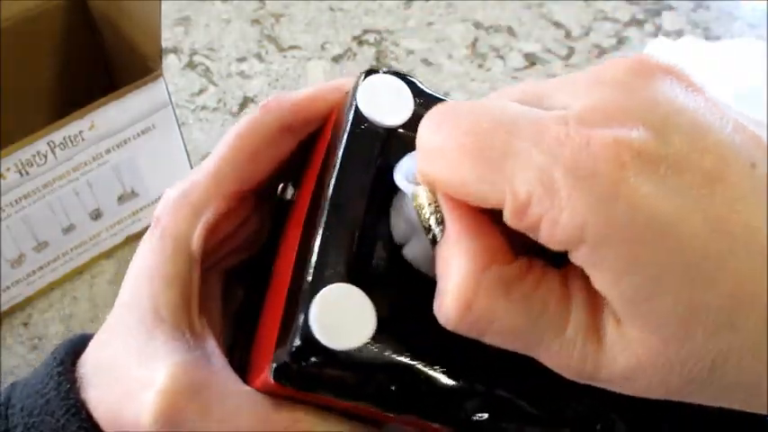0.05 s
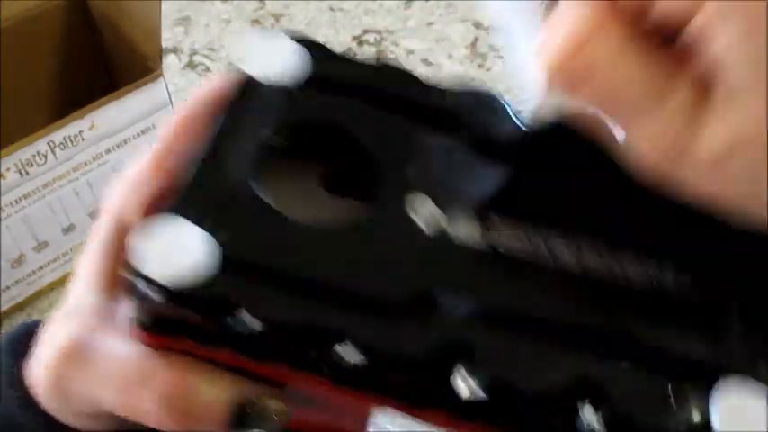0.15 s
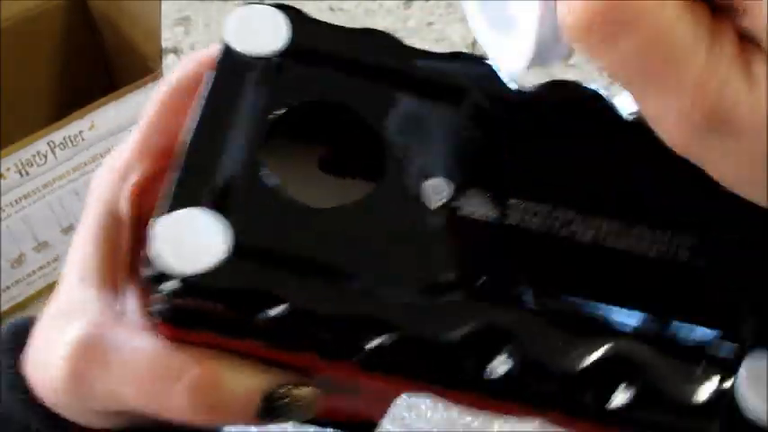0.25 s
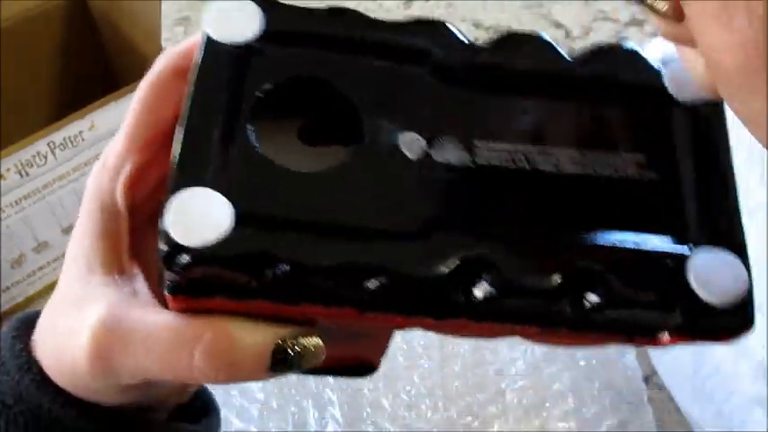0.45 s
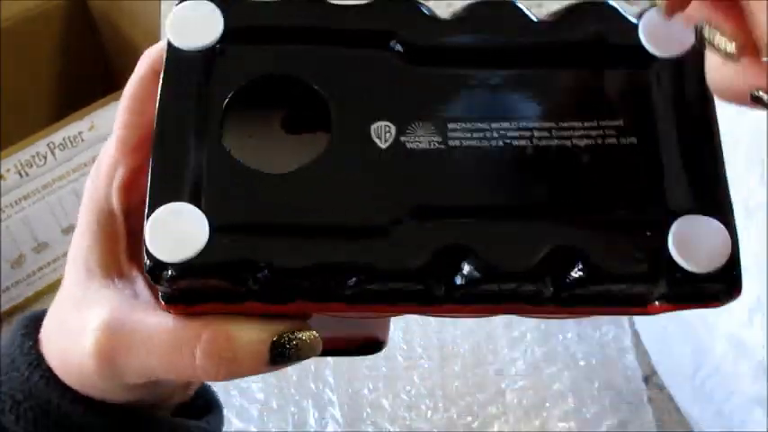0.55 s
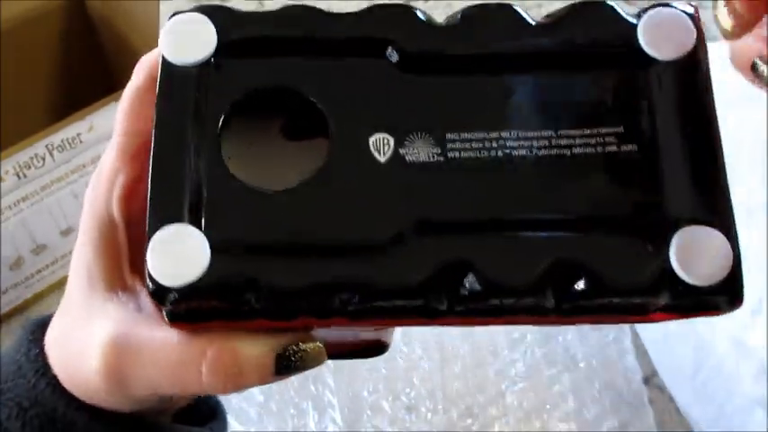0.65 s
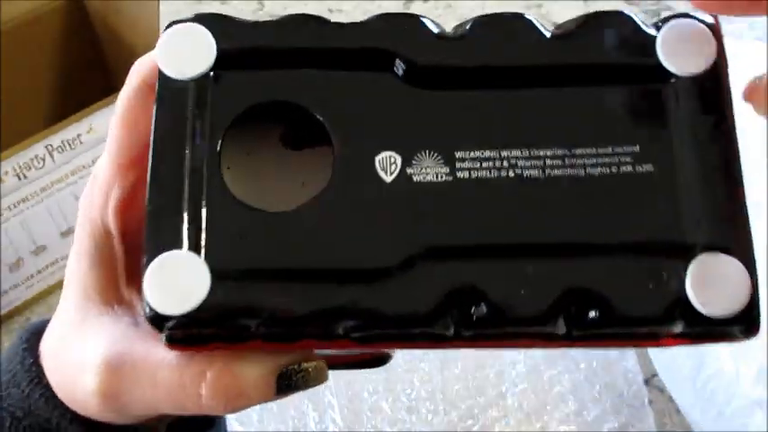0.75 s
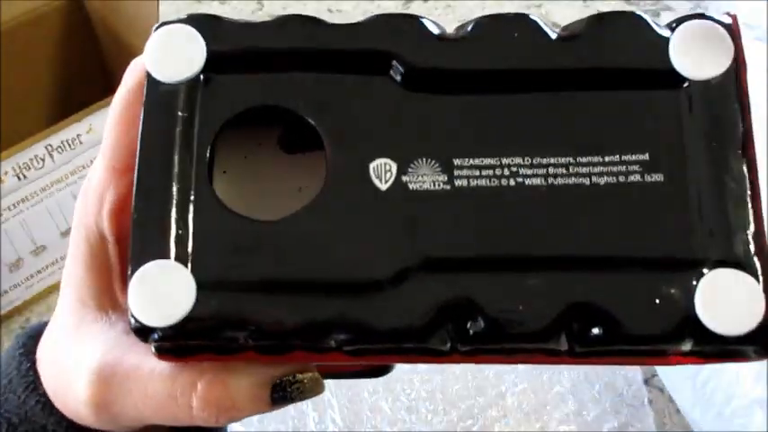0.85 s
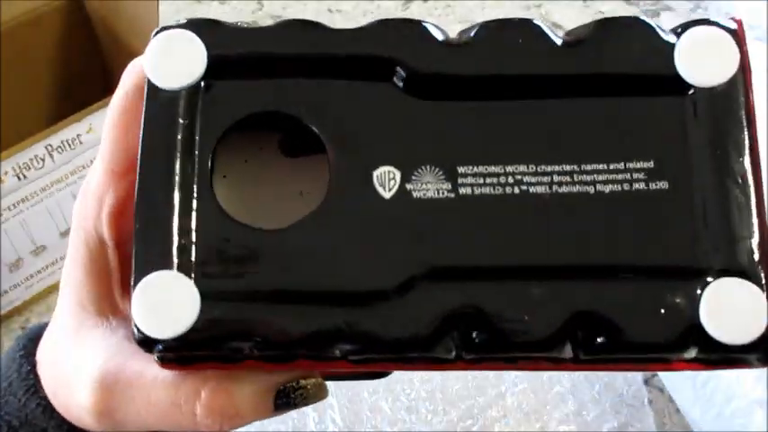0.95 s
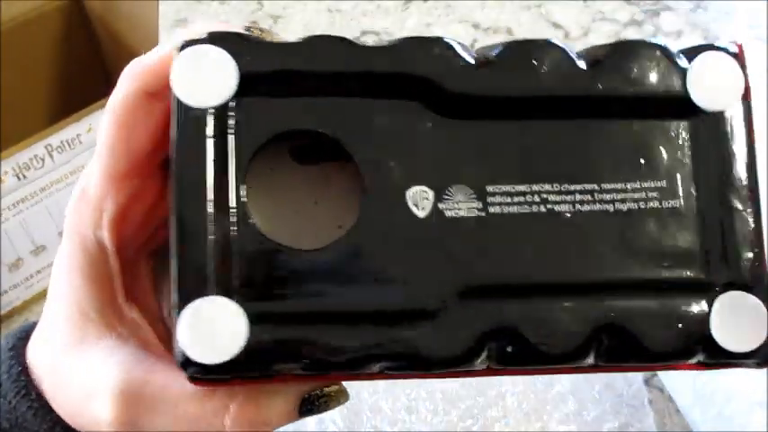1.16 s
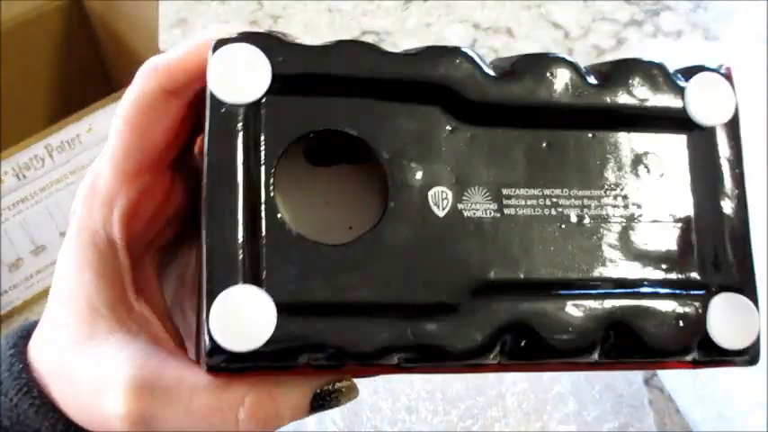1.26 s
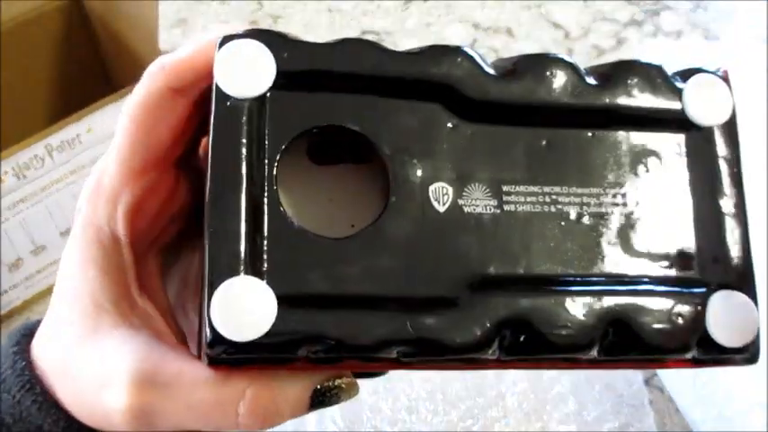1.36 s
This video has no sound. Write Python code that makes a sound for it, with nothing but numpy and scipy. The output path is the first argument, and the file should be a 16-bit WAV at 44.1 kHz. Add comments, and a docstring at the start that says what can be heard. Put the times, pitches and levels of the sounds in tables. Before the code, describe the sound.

A soft plastic stopper pops out of a hollow ceramic box after a few faint creaks and a brief squeak. Fingers tick on the glaze, then one sharp click and a soft bump follow, close by in a quiet room.

```python
"""A stopper popping out of a ceramic box

A soft plastic stopper creaks in the base of a hollow ceramic box, slides, and pops out. The air inside
resonates, rising in pitch as the hole opens, and the stopper's lip flicks over the rim. Fingers brush and
tick on the glaze; one sharp click and a soft bump on the counter follow, close by in a quiet room."""
import sys
import numpy as np
from scipy import signal
from scipy.fft import rfft, irfft
from scipy.io import wavfile

SR = 44100
rng = np.random.default_rng(int(sys.argv[2]) if len(sys.argv) > 2 else 0)


def log_audio(samples):
    """Write samples as a 16-bit WAV file to the path given in sys.argv[1]."""
    # one column per channel
    frames = np.atleast_2d(samples).T
    # limit to full scale, then quantise
    limited = np.clip(frames, -1, 1)
    pcm = np.round(limited * 32767).astype(np.int16)
    wavfile.write(sys.argv[1], SR, pcm)


N = 61739
T = np.arange(N) / SR


def undb(db):
    """Amplitude ratio of a level in decibels."""
    return 10 ** (np.asarray(db) / 20)


def unit(x):
    """Normalisation to rms 1."""
    return x / np.std(x)


def fade(t60, start=0):
    """Exponential decay from a start time, falling 60 dB in t60 seconds."""
    return (T >= start) * np.exp(-np.log(1000) * np.maximum(T - start, 0) / t60)


def later(x, s):
    """Pure delay of s seconds."""
    return np.concatenate([np.zeros(max(int(s * SR), 0)), x])[:N]


def through(x, response):
    """Convolution with an impulse response."""
    return signal.fftconvolve(x, response)[:N]


def colour(points, tilt_db=0):
    """Minimum-phase response of unit energy from a spectrum, tilted by tilt_db an octave above 1024 Hz."""
    hz, db = np.array(points, float).T
    octave = np.log2(np.maximum(np.fft.rfftfreq(8192, 1 / SR), 1))
    gain = undb(np.interp(octave, np.log2(hz), db) + tilt_db * np.maximum(octave, 10))
    cepstrum = irfft(np.log(gain))
    half = len(cepstrum) // 2
    cepstrum[1:half] *= 2
    cepstrum[half + 1:] = 0
    response = irfft(np.exp(rfft(cepstrum)))[:half]
    return response / np.linalg.norm(response)


def noise(points):
    """Spectrally shaped Gaussian noise of rms 1."""
    return unit(through(rng.standard_normal(N), colour(points)))


def ring(modes):
    """Free vibration: one damped sinusoid for each mode."""
    return sum(undb(db) * np.sin(2 * np.pi * hz * T) * fade(t60) for hz, db, t60 in modes)


def contact(t60, rough):
    """Contact force: an impulse followed by a short crunch of noise."""
    crunch = rng.standard_normal(N) * fade(t60) * (T > 0)
    return (T == 0) + rough * crunch / np.linalg.norm(crunch)


def slips(scatter_db):
    """Friction noise: dense tiny slips whose size changes every 20 samples."""
    grains = rng.standard_normal(N)
    size_db = scatter_db * np.repeat(rng.standard_normal(N // 20 + 1), 20)[:N]
    return unit(grains * undb(size_db))


def creaks():
    """Stick-slip friction: the stopper grips and lets go as it is worked loose."""
    # slips of the stopper: start_s, relative_level_db
    releases = [(0.0006, -21), (0.0097, -30.5), (0.0268, -28.5), (0.1373, -26.5), (0.1485, -30),
                (0.1635, -33), (0.178, -31.5), (0.179, -30.5), (0.1986, -38)]
    # spectrum of a creak: frequency_hz, level_db
    spectrum = [(200, -26), (1300, -8.5), (2000, -4), (2800, -4.5), (4200, -2), (5500, -17), (8000, -18.5),
                (15000, -40)]
    force = sum(undb(db) * later(contact(t60=0.0071, rough=1.15), s) for s, db in releases)
    return 2 * through(force, colour(spectrum))


def wall_ring(blows):
    """Modal resonance: blows on the rim set the ceramic wall ringing."""
    # modes of the wall: pitch_hz, relative_level_db, t60_s
    modes = [(838, -3, .12), (1910, -3, .04), (2104, -6, .1), (2235, 2.5, 0.1), (3220, 1, 0.028),
             (3765, 1, 0.068), (4450, -2, 0.037), (5230, 5, 0.016), (6960, -5, 0.023)]
    return undb(-44) * through(blows, ring(modes))


def scuffs():
    """Sliding friction: stopper and fingers brush the glaze in strokes that rise fast and decay."""
    # strokes on the glaze: start_s, level_db, attack_s, t60_s
    strokes = [(0.001, -49, 0.0017, 0.11), (0.245, -26.5, 0.0071, 0.094), (0.269, -25.5, 0.0075, 0.031),
               (0.321, -41, .002, 0.14), (0.367, -42.5, 0.003, 0.11)]
    # spectrum of a scuff: frequency_hz, level_db
    spectrum = [(100, -15), (700, -19.5), (1400, -6), (2100, 4), (3000, -1), (4400, -0.5), (6000, -2),
                (8500, -9), (11000, -16.5), (15000, -35)]
    pressure = np.zeros(N)
    for s, db, attack, t60 in strokes:
        rise = np.maximum(T - s, 0) / attack
        pressure += undb(db) * np.where(T < s + attack, rise, fade(t60, s + attack))
    return pressure * through(slips(scatter_db=4.5), colour(spectrum))


def lip_squeak():
    """Forced vibration: friction drives the resonances of the lip as it slides through the hole."""
    # resonances of the lip: pitch_hz, bandwidth_hz, gain_db
    resonances = [(2290, 780, 1.5), (3100, 150, -12), (4330, 150, 0.5), (4890, 300, 7), (7070, 300, -15),
                  (8190, 320, -11), (8500, 220, -18), (10400, 610, -37), (13100, 670, -13)]
    # envelope of the slide: time_s, level_db
    slide = [(0.208, -56), (0.222, -35.5), (0.226, -30), (0.229, -22), (0.236, -19.5), (0.239, -36),
             (0.248, -30), (0.26, -60)]
    grit = slips(scatter_db=4)
    lip = undb(-19) * grit  # broadband part
    for hz, width, db in resonances:
        lip += undb(db) * signal.lfilter(*signal.iirpeak(hz, hz / width, SR), grit)
    time_s, level_db = np.array(slide).T
    sliding = (T > time_s[0]) & (T < time_s[-1])
    return unit(lip) * undb(np.interp(T, time_s, level_db)) * sliding


def air_mode(hz, pulses, attack_s=0.001):
    """Damped oscillation of enclosed air at a gliding pitch; each pulse takes over from the last."""
    amplitude = 0
    for s, db, t60 in pulses:
        held = np.exp(-np.maximum(T - s, 0) / attack_s)
        amplitude = held * amplitude + (1 - held) * undb(db) * fade(t60, s)
    started = T > pulses[0][0]
    return -amplitude * np.sin(2 * np.pi * np.cumsum(hz * started) / SR)


def pop():
    """Cavity resonance: the seal snaps and two air modes ring, rising as the hole is uncovered."""
    # air pulses: start_s, hollow_db (before the surge), hollow_t60_s, upper_db, upper_t60_s
    pulses = [(0.2294, -15.5, 0.17, -17, 0.16), (0.271, -17, 0.056, -20.5, 0.095)]
    # spectrum of the seal letting go: frequency_hz, level_db
    snap_spectrum = [(100, -52), (300, -1.5), (550, -3.5), (850, 4.5), (1400, -2), (3000, -28.5),
                     (15000, -50)]
    start_s = pulses[0][0]
    since = np.maximum(T - start_s, 0)

    def glide(shut_hz, open_hz, opening_s):
        return open_hz + (shut_hz - open_hz) * np.exp(-since / opening_s)

    hollow_hz = glide(shut_hz=204.3, open_hz=362.8, opening_s=0.0127)
    scoop_hz = 650 * np.exp(-since / 0.0017)  # the upper mode swoops in from below
    upper_hz = glide(shut_hz=1238, open_hz=1335, opening_s=0.085) - scoop_hz
    surge_db = 9.5 * np.exp(-since / 0.0087)  # the first rush of air swells the hollow note
    hollow = air_mode(hollow_hz, [(s, db, t60) for s, db, t60, _, _ in pulses]) * undb(surge_db)
    upper = air_mode(upper_hz, [(s, db, t60) for s, _, _, db, t60 in pulses])
    snap = -undb(1) * through(contact(t60=0.0027, rough=0.65), colour(snap_spectrum))
    low_cut = signal.butter(3, 130, "high", fs=SR, output="sos")
    return signal.sosfilt(low_cut, hollow + upper + later(snap, start_s))


def flicks():
    """Impulsive excitation: the stopper's lip flicks over the rim."""
    # blows of the lip: start_s, relative_level_db, tilt_db_per_octave
    blows = [(0.2357, -5, 5), (0.2761, -6.5, -2.5), (0.2802, -16, 0)]
    # spectrum of a flick: frequency_hz, level_db
    spectrum = [(100, -16), (600, -24.5), (1300, -3), (1900, 1), (2500, -5.5), (4100, 6.5), (5600, -5),
                (7500, -1.5), (10000, -8.5), (15000, -22.5)]
    sound = np.zeros(N)
    for s, db, tilt in blows:
        flick = through(contact(t60=0.0048, rough=1.0), colour(spectrum, tilt))
        sound += undb(db) * later(flick, s)
    return 2 * sound


def jolts():
    """Heavily damped vibration: each jolt of the box in the hand is one dull, low mode."""
    # jolts of the box: start_s, level_db, pitch_hz, t60_s
    shakes = [(0.275, -28.5, 120, 0.055), (0.371, -37, 158, 0.092), (0.6201, -30.5, 267, .025)]
    return sum(later(ring([(hz, db, t60)]), s) for s, db, hz, t60 in shakes)


def ticks():
    """Hard impact: nails and stopper make broadband clicks, each with a very short ring."""
    # taps: start_s, relative_click_db, tilt_db_per_octave, ring_hz, relative_ring_db
    taps = [(0.3696, -25.5, 4, 7400, -35), (0.3715, -27, 8, 10600, -29), (0.3725, -28, 3, 7600, -30),
            (0.375, -27, 5, 7760, -39), (0.388, -23.5, -2, 7500, -31), (0.599, -43, -6.5, 5850, -38),
            (0.6197, -10, 0, 8160, -13), (0.7902, -39, -6, 4170, -36), (0.807, -29.5, -8, 6330, -30),
            (0.8674, -34, -2, 4060, -34), (1.0248, -36, -2.5, 6630, -33), (1.174, -35, -4, 3720, -43),
            (1.1984, -34.5, 0, 9350, -39), (1.3497, -35, -2.5, 4940, -34.5)]
    # spectrum of a click: frequency_hz, level_db
    spectrum = [(200, -21), (1000, -14.5), (1800, -6.5), (2400, -16.5), (3400, -2), (4500, -11),
                (6200, -2.5), (7100, -2.5), (8100, -5), (10000, -7.5), (12500, -11.5), (15000, -16)]
    sound = np.zeros(N)
    for s, click_db, tilt, ring_hz, ring_db in taps:
        click = np.pad(colour(spectrum, tilt), (0, N))[:N]
        tone = np.cos(2 * np.pi * ring_hz * T) * T * fade(t60=0.0013)
        response = undb(click_db) * click + undb(ring_db) * tone / np.linalg.norm(tone)
        sound += later(through(contact(t60=0.006, rough=0.42), response), s)
    return 2 * sound


def bumps():
    """Soft impact: a bump on the counter excites a low thud and a gritty knock with little treble."""
    # bumps on the counter: start_s, thud_db, knock_db
    impacts = [(0.7847, -30, -33.5), (0.8083, -41, -38)]
    # modes of the thud: pitch_hz, relative_level_db, t60_s
    thud_modes = [(33, -9.5, 0.7), (51.4, -13, 0.36), (62, -31, .25), (101, -0.5, 0.35), (127.4, 0, 0.2),
                  (280, 2, 0.043)]
    # modes of the knock: pitch_hz, relative_level_db, t60_s
    knock_modes = [(550, -23, .04), (830, -3.5, 0.021), (914, -6, 0.034), (1170, -5.5, .02),
                   (1256, -7, 0.036), (1620, -14, 0.048), (2180, -11, .025)]
    sound = np.zeros(N)
    for s, thud_db, knock_db in impacts:
        knock = through(contact(t60=0.034, rough=0.97), ring(knock_modes))
        sound += later(undb(thud_db) * ring(thud_modes) + undb(knock_db) * knock, s)
    return signal.sosfilt(signal.butter(2, 2520, fs=SR, output="sos"), sound)


def reflections(x):
    """Reverberation: a quick scatter off the counter and a short tail whose treble dies first."""
    # spectrum of the room's reflections: frequency_hz, level_db
    room_spectrum = [(60, -13.5), (300, 4), (700, 0.5), (2000, -2.5), (5000, -8.5), (8000, -10.5),
                     (15000, -7.5)]
    # spectrum of the counter's scatter: frequency_hz, level_db
    counter_spectrum = [(100, -31), (400, -20), (1300, 0.5), (3000, -1), (8000, -6), (15000, -8)]
    wash = noise(room_spectrum)
    low = signal.sosfilt(signal.butter(1, 2500, fs=SR, output="sos"), wash)
    tail = low * fade(t60=0.43) + (wash - low) * fade(t60=0.33)
    early = noise(counter_spectrum) * fade(t60=0.029)
    response = undb(-20.5) * tail / np.linalg.norm(tail) + undb(-20) * early / np.linalg.norm(early)
    return through(x, later(response, s=0.0072))


def room_tone(hum_hz=118.1):
    """Stationary background: coloured noise and a faint mains hum."""
    # spectrum of the quiet room: frequency_hz, level_db
    spectrum = [(15, -40), (25, -12), (54, -2.5), (90, -12.5), (103, -4.5), (125, -2), (146, -14),
                (176, -2.5), (219, -7.5), (354, -9.5), (383, -12.5), (450, -8.5), (749, -20.5),
                (927, -16.5), (1090, -23.5), (1500, -17), (2130, -27), (7280, -32.5), (15000, -42.5)]
    hum = np.sqrt(2) * np.sin(2 * np.pi * hum_hz * T)
    return undb(-46) * noise(spectrum) + undb(-55) * hum


def scene():
    """Superposition of the direct sounds, their reflections and the background, in mono."""
    opening = pop() + lip_squeak() + scuffs()
    rim = creaks() + flicks()
    handling = jolts() + ticks() + bumps()
    direct = opening + rim + wall_ring(rim) + handling
    return (direct + reflections(direct) + room_tone())[None]


def record(dry, top_hz=14900):
    """Band limiting: a steep low-pass filter cuts the highest treble."""
    return signal.sosfilt(signal.ellip(8, .2, 80, top_hz, fs=SR, output="sos"), dry)


dry = scene()
out = record(dry)
log_audio(out)
```